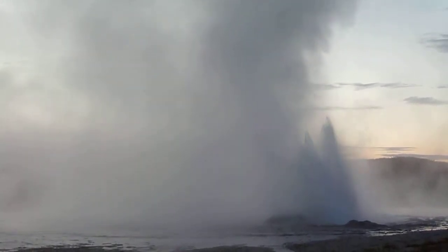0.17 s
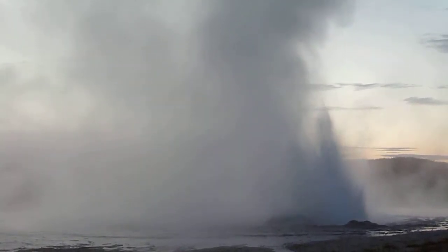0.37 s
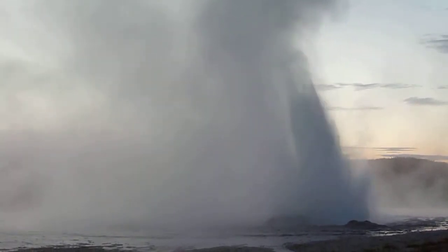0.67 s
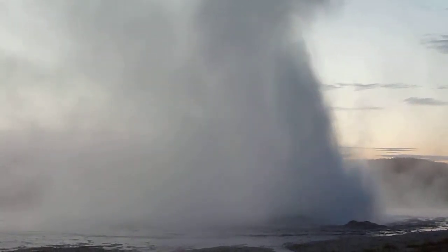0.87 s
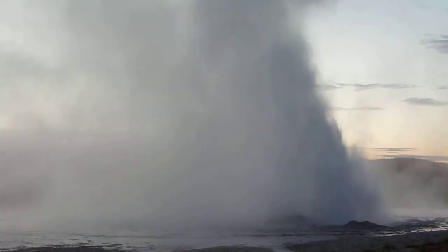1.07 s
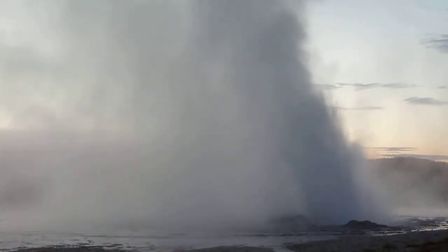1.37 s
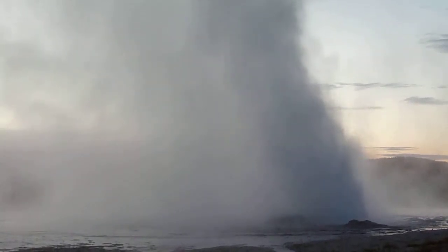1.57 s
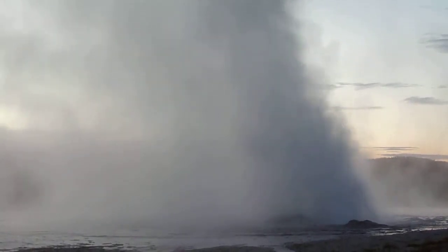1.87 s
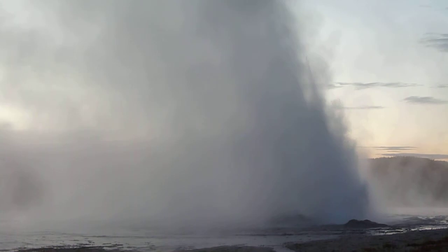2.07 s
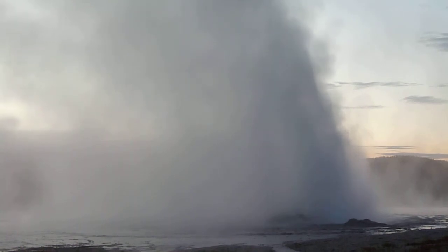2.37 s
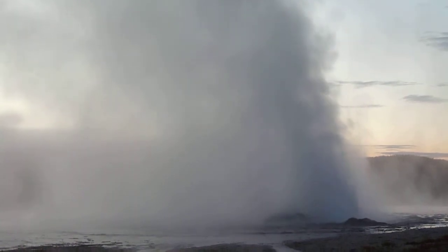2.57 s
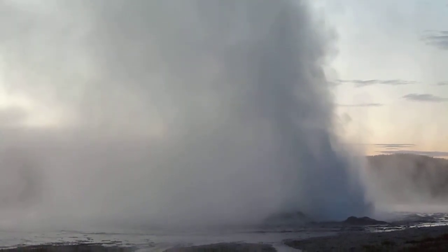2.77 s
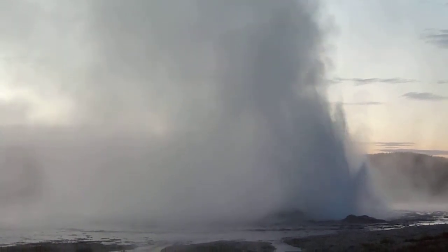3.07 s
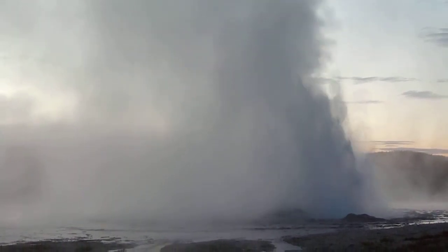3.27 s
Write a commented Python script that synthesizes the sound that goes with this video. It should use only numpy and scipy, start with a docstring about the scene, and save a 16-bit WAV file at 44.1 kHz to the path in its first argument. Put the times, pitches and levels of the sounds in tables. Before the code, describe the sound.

Geyser jet of steam and water hissing steadily over throbbing deep rumble, with brief watery slaps

```python
"""Geyser eruption on stony ground

Surges of steam and water rumble in the vent: level-shaped noise in boom, throat, deep and churn bands.
The jet's hiss and the falling water are noise mixed with random grains; the hiss has one short ground echo.
Heavy slugs of water slap the rock: bright noise cracks with a spatter tail and two ringing hollows.
"""
import sys
import numpy as np
from scipy import signal
from scipy.fft import rfft, irfft
from scipy.io import wavfile
from scipy.ndimage import uniform_filter1d

SR = 44100
rng = np.random.default_rng(int(sys.argv[2]) if len(sys.argv) > 2 else 0)


def store_wav(level_fs):
    """Save 16-bit WAV to argv[1]."""
    pcm = np.round(np.clip(np.atleast_2d(level_fs), -1, 1) * 32767)
    wavfile.write(sys.argv[1], SR, pcm.T.astype(np.int16))


N = 150822  # samples

# Levels over time, before each layer's trim. Each row: time in seconds, level in dB.
# Hiss of the jet and its spray.
SPRAY_LEVEL = [(0, -39.5), (.11, -41.5), (.37, -37.5), (.48, -40.5), (.75, -40.5), (1.12, -39),
               (1.35, -38.6), (1.7, -38.5), (1.78, -40.5), (1.93, -39), (2.02, -41.5), (2.11, -38),
               (2.24, -42), (2.52, -40.3), (2.68, -40), (2.79, -37.5), (2.89, -40), (2.95, -38.5),
               (3.15, -41.5), (3.25, -38.5), (3.42, -42)]
# Water coming down around the cone.
FALL_LEVEL = [(0, -42), (.3, -43.5), (.42, -40.5), (.55, -41.5), (.72, -40), (1.0, -40), (1.15, -41.5),
              (1.35, -40.5), (1.5, -41), (1.8, -42), (2.12, -41.5), (2.23, -44.5), (2.4, -46),
              (2.47, -40.5), (2.65, -43), (2.9, -41.5), (3.1, -42.5), (3.42, -42)]
# Surges in the vent.
SURGE_LEVEL = [(0.0, -37.5), (0.28, -35.5), (0.42, -27.5), (0.45, -33.5), (0.8, -36), (0.85, -32),
               (1.17, -38), (1.35, -24.5), (1.49, -37), (1.51, -31.5), (1.76, -35), (1.8, -30),
               (1.97, -37.5), (2.09, -36.5), (2.11, -34.5), (2.19, -38.5), (2.29, -32.5), (2.39, -44),
               (2.43, -33.5), (2.55, -35), (2.59, -40), (2.76, -30), (2.93, -34.5), (2.96, -41.5),
               (3.04, -29.5), (3.1, -41.5), (3.13, -32.5), (3.26, -33), (3.32, -42), (3.42, -31)]
# Deepest rumble.
DEEP_LEVEL = [(0.0, -42), (0.03, -44), (0.21, -46), (0.35, -33.5), (0.48, -37), (1.16, -45.5), (1.3, -42),
              (1.32, -35.5), (1.53, -43.5), (1.57, -34), (1.89, -43.5), (2.05, -39), (2.09, -33.5),
              (2.17, -53), (2.5, -36.5), (2.59, -44), (2.8, -31.5), (2.95, -42), (3.11, -41), (3.16, -28),
              (3.2, -37.5), (3.42, -47)]
# Churning of the pool.
CHURN_LEVEL = [(0.0, -41), (0.2, -38.5), (0.28, -40.5), (0.43, -36), (0.46, -39.5), (1.18, -41),
               (1.29, -37.5), (1.48, -41), (2.76, -40.5), (2.83, -38.5), (2.9, -43.5), (3.09, -39),
               (3.36, -42.5), (3.42, -42)]

# Spectra of the layers. Each row: frequency in Hz, relative density in dB per Hz.
# Hiss of the spray.
SPRAY_COLOUR = [(1200, -21.5), (2100, -2), (2700, 1), (3100, -2.5), (3500, 1.5), (4300, 1.6), (5300, 1.1),
                (6000, -1), (6700, -2.5), (7250, -8), (7700, -12.5)]
# Wash of the falling water.
FALL_COLOUR = [(400, -0.5), (700, 0.5), (1030, 3.5), (1290, -5), (1530, 0), (1740, -10.5), (1920, -3.5),
               (2100, -10), (3000, -2), (6000, -17.5)]
# Boom of the vent.
VENT_COLOUR = [(50, -24), (90, -7), (125, 3.5), (170, 3.5), (195, -1.5), (225, 0), (262, -2.5), (300, -13),
               (400, -15), (600, -22.5), (1200, -37.5), (4000, -68)]
# Ring of the throat.
THROAT_COLOUR = [(120, -37), (195, -15), (215, -7), (230, -4), (258, -5), (290, -20.5), (450, -42),
                 (1500, -80)]
# Deepest rumble.
DEEP_COLOUR = [(15, -32.5), (26, -15), (40, -8.5), (60, -0.5), (85, 0.5), (110, -6.5), (160, -21.5),
               (400, -52)]
# Churning of the pool.
CHURN_COLOUR = [(150, -12.5), (320, -1), (400, -2), (450, 0), (570, 0.5), (680, -9.5), (900, -21),
                (1300, -23.5)]

# Stereo width of the steady layers. Each row: frequency in Hz, side minus mid in dB.
WIDTH = [(60, -26.5), (150, -32), (300, -25), (550, -17.5), (1000, -12), (2000, -10.5), (4500, -16),
         (6000, -13.5), (7500, -19)]
# Slugs of water hitting rock. Each row: start in seconds, level in dB, brightness (low-pass) in Hz,
# crack decay in seconds, spatter in dB against the crack.
SLAPS = [(.4160, -22, 1950, .0012, -21), (.4238, -30, 1850, .0013, -20), (.4378, -20.5, 2070, 0.0017, -22),
         (1.3890, -22, 6100, 0.0013, -11), (1.4081, -26, 1900, 0.0018, -12.5),
         (1.6566, -15.5, 6150, 0.00043, -9.5), (2.436, -33, 1490, 0.0013, -11.5),
         (2.470, -29.5, 1260, 0.0023, -10), (2.718, -31, 1620, .002, -19), (2.947, -30.5, 1800, .002, -16)]
# Water-filled hollows in the rock. Each row: resonance in Hz, Q (no unit), linear gain (no unit).
HOLLOWS = [(1550, 19, 1), (5300, 33, 1.4)]
# Level difference of the microphones. Each row: frequency in Hz, left minus right in dB.
MIC_BALANCE = [(60, 1.0), (94, 1.0), (150, 1.0), (230, 0.91), (360, 1.0), (560, 0.83), (880, 1.0),
               (1370, 0.83), (2140, 0.0), (3350, -1.0), (5240, 0.0), (8200, 0.0)]
# Phase difference of the microphones. Each row: frequency in Hz, lead of the left in radians.
MIC_PHASE = [(0, 0.01), (2330, 0.76), (3450, 0.4), (3790, 0.7), (7410, 0.22), (8350, 0.05)]
# Treble roll-off of the recorder. Each row: frequency in Hz, gain in dB.
RECORDER_RESPONSE = [(7300, 0.5), (7650, -8.5), (8000, -19.5), (8700, -21.5)]

SPRAY_TRIM_DB, FALL_TRIM_DB = -0.52, 1
VENT_TRIM_DB, DEEP_TRIM_DB, CHURN_TRIM_DB = -1.43, -0.5, 1.2
DROPS_PER_S, DROP_SPREAD_DB, DROPS_DB = 5000, 2, -5  # level against the smooth hiss
SPLASHES_PER_S, SPLASH_SPREAD_DB, SPLASHES_DB = 700, 2.5, -4.5  # level against the wash
SPRAY_FLICKER_DB, FALL_FLICKER_DB, BOOM_FLICKER_DB = 0.4, 0.55, 0.66  # rms
GROUND_ECHO_S, GROUND_ECHO_GAIN = 0.0025, 0.32
SLAP_ATTACK_S, SPATTER_DECAY_S, SPATTER_RAGGED_DB = 0.00015, 0.012, 1.66
SLAP_LOW_HZ, SLAP_SIDE_DB = 557, -13
THROAT_DB, THROAT_FOLLOWS = -41.5, 1.39  # level at the mean surge; dB per dB of surge
CUTOFF_HZ = 8807


def from_db(db):
    """Decibels to linear gain."""
    return 10 ** (np.asarray(db) / 20)


def rms_one(x):
    """Scale to an rms of one."""
    return x / np.sqrt(np.mean(x ** 2) + 1e-20)


def in_time(rows):
    """Interpolate a (seconds, value) table to every sample."""
    return np.interp(np.arange(N) / SR, *np.transpose(rows))


def coloured(x, points):
    """Filter by a (Hz, dB) curve, interpolated over log frequency."""
    hz, db = np.transpose(points)
    bins_hz = np.maximum(np.fft.rfftfreq(N, 1 / SR), 1)
    gain = from_db(np.interp(np.log(bins_hz), np.log(hz), db))
    return irfft(rfft(x) * gain, N)


def drift(rate_hz):
    """Slow random wander: low-passed noise with an rms of one."""
    bins_hz = np.fft.rfftfreq(N, 1 / SR)
    spectrum = rfft(rng.standard_normal(N))
    return rms_one(irfft(spectrum / (1 + (bins_hz / rate_hz) ** 2), N))


def stereo_noise():
    """White noise as independent mid and side."""
    return rng.standard_normal((2, N))


def grains(per_s, spread_db):
    """Random impacts of uneven size, as mid and side; each has its own stereo place."""
    born = rng.random(N) < per_s / SR
    size_db = spread_db * np.minimum(rng.exponential(1, N), 5)
    sizes = from_db(size_db) * rng.choice([-1, 1], N)
    mid = rms_one(born * sizes)
    return mid * np.array([np.ones(N), rng.standard_normal(N)])


def placed(mid_side, colour, even_s):
    """Colour a layer, level its mid over even_s and decode it to left and right."""
    mid, side = coloured(mid_side, colour)
    level = np.sqrt(uniform_filter1d(mid ** 2, max(int(even_s * SR), 1)) + 1e-12)
    return (mid + coloured(side, WIDTH) * [[1], [-1]]) / level


def even_noise(size, count):
    """Two rows of noise from short frames, each with a flat spectrum and random phases."""
    phases = 2 * np.pi * rng.random((2, count, size // 2 + 1))
    return irfft(np.exp(1j * phases), size).reshape(2, -1)


def spray():
    """Steam and fine drops hiss together, with one delayed copy off the ground."""
    hiss = stereo_noise() + from_db(DROPS_DB) * grains(DROPS_PER_S, DROP_SPREAD_DB)
    echo = np.roll(hiss, round(GROUND_ECHO_S * SR), axis=1)
    hiss = hiss + GROUND_ECHO_GAIN * echo
    level_db = SPRAY_TRIM_DB + in_time(SPRAY_LEVEL) + SPRAY_FLICKER_DB * drift(35)
    return placed(hiss, SPRAY_COLOUR, even_s=0.25) * from_db(level_db)


def falling_water():
    """Sheets of water land as a wash of overlapping splashes."""
    water = stereo_noise() + from_db(SPLASHES_DB) * grains(SPLASHES_PER_S, SPLASH_SPREAD_DB)
    level_db = FALL_TRIM_DB + in_time(FALL_LEVEL) + FALL_FLICKER_DB * drift(27)
    return placed(water, FALL_COLOUR, even_s=0.36) * from_db(level_db)


def slaps():
    """Each slug lands with a short crack, rings the hollows and spatters unevenly."""
    out = np.zeros((2, N))
    high_pass = signal.butter(2, SLAP_LOW_HZ, "high", fs=SR, output="sos")
    for start_s, level_db, bright_hz, crack_s, spatter_db in SLAPS:
        low_pass = signal.butter(4, bright_hz, fs=SR, output="sos")
        burst = signal.sosfilt(np.vstack([high_pass, low_pass]), even_noise(size=96, count=48))
        ringing = burst
        for hz, q, gain in HOLLOWS:
            b, a = signal.iirpeak(hz, q, fs=SR)
            ringing = ringing + gain * signal.lfilter(b, a, burst)
        mid, side = rms_one(ringing)

        t = np.arange(len(mid)) / SR
        ragged = rms_one(uniform_filter1d(rng.standard_normal(len(t)), size=100))
        spatter = from_db(spatter_db + SPATTER_RAGGED_DB * ragged) * np.exp(-t / SPATTER_DECAY_S)
        attack = 1 - np.exp(-t / SLAP_ATTACK_S)
        shape = attack * (np.exp(-t / crack_s) + spatter)
        left_right = mid + from_db(SLAP_SIDE_DB) * side * [[1], [-1]]
        start = int(start_s * SR)
        out[:, start:start + len(t)] += from_db(level_db) * shape * left_right
    return out


def vent():
    """Surges boom and ring in the throat, harder when strong, over deep rumble and pool churn."""
    surge_db = in_time(SURGE_LEVEL)
    boom = placed(stereo_noise(), VENT_COLOUR, even_s=0.04)
    throat = placed(stereo_noise(), THROAT_COLOUR, even_s=0.052)
    deep = placed(stereo_noise(), DEEP_COLOUR, even_s=0.06)
    churn = placed(stereo_noise() + grains(per_s=500, spread_db=2.7), CHURN_COLOUR, even_s=0.09)

    boom_db = VENT_TRIM_DB + surge_db + BOOM_FLICKER_DB * drift(25)
    throat_db = THROAT_DB + THROAT_FOLLOWS * (surge_db - surge_db.mean())
    deep_db = DEEP_TRIM_DB + in_time(DEEP_LEVEL)
    churn_db = CHURN_TRIM_DB + in_time(CHURN_LEVEL)
    return (boom * from_db(boom_db) + throat * from_db(throat_db)
            + deep * from_db(deep_db) + churn * from_db(churn_db))


def scene():
    """Sum of spray, falling water, slaps and vent."""
    return spray() + falling_water() + slaps() + vent()


def record(dry):
    """Two microphones unlike in level and phase; the recorder cuts the treble steeply."""
    bins_hz = np.fft.rfftfreq(N, 1 / SR)
    balance_db = np.interp(bins_hz, *np.transpose(MIC_BALANCE))
    phase_rad = np.interp(bins_hz, *np.transpose(MIC_PHASE))
    # half of each difference per channel, in opposite directions
    unlike = from_db(balance_db / 2) * np.exp(0.5j * phase_rad)
    heard = irfft(rfft(dry) * [unlike, 1 / unlike], N)
    heard = coloured(heard, RECORDER_RESPONSE)
    low_pass = signal.ellip(10, 0.2, 80, CUTOFF_HZ, fs=SR, output="sos")
    return signal.sosfilt(low_pass, heard)


dry = scene()
out = record(dry)
store_wav(out)
```